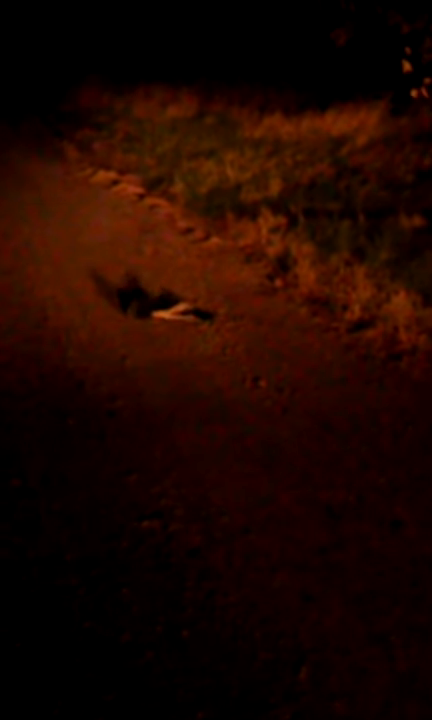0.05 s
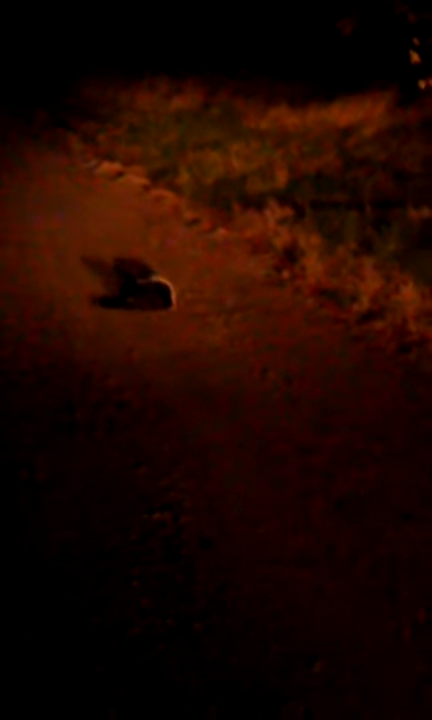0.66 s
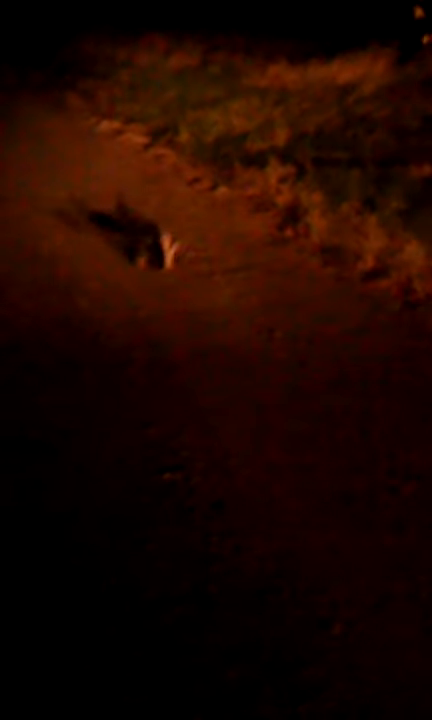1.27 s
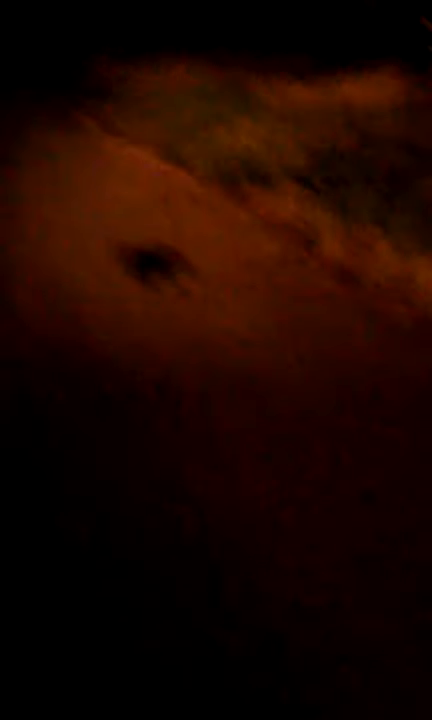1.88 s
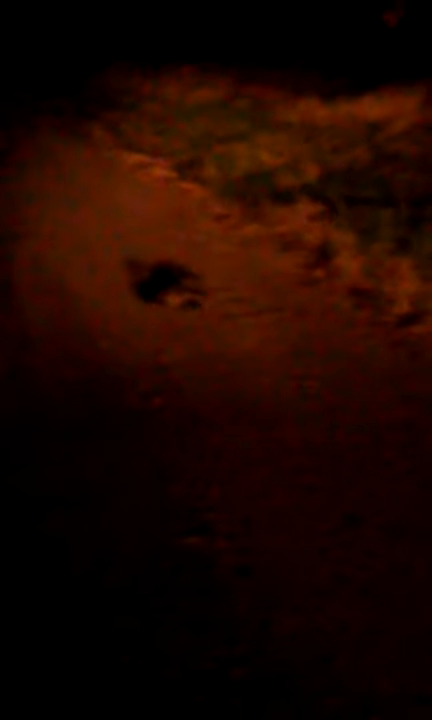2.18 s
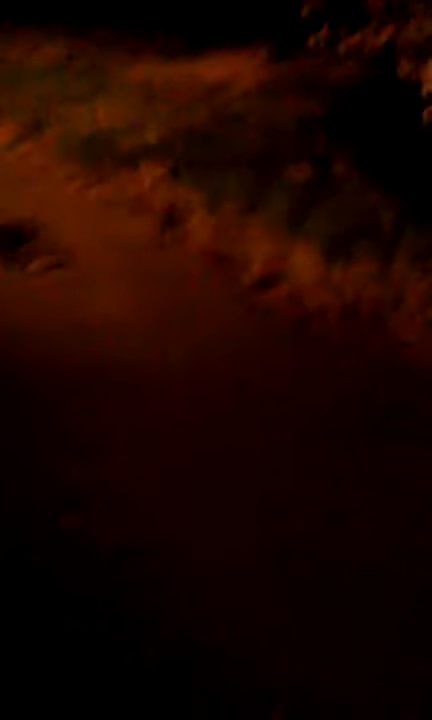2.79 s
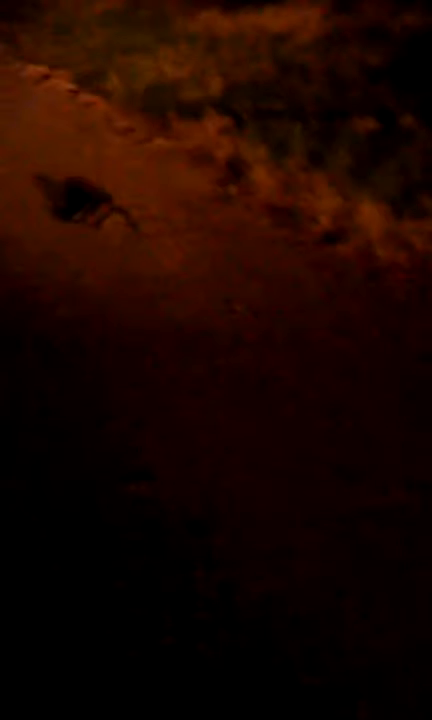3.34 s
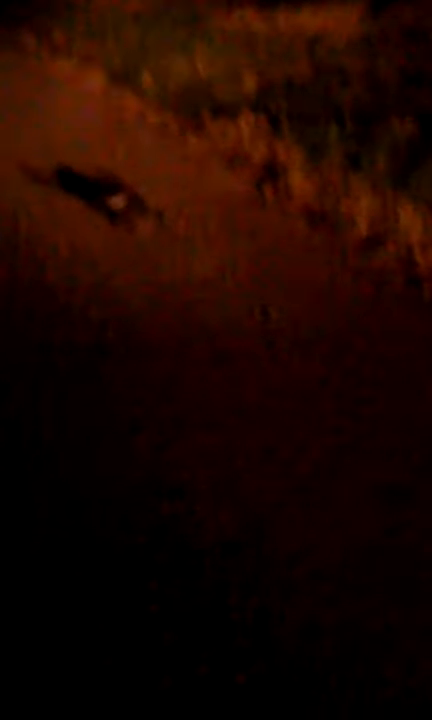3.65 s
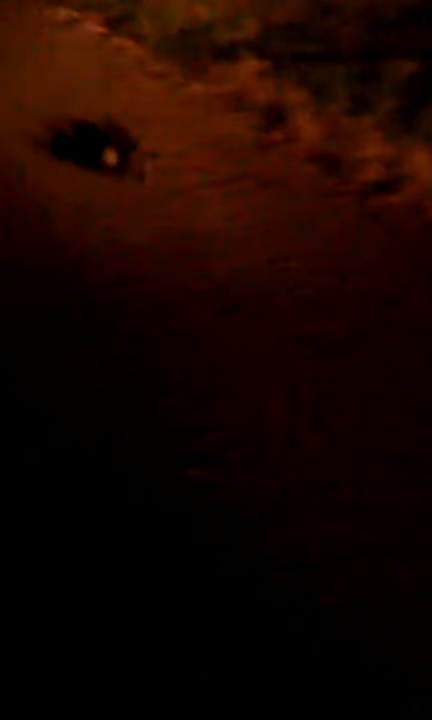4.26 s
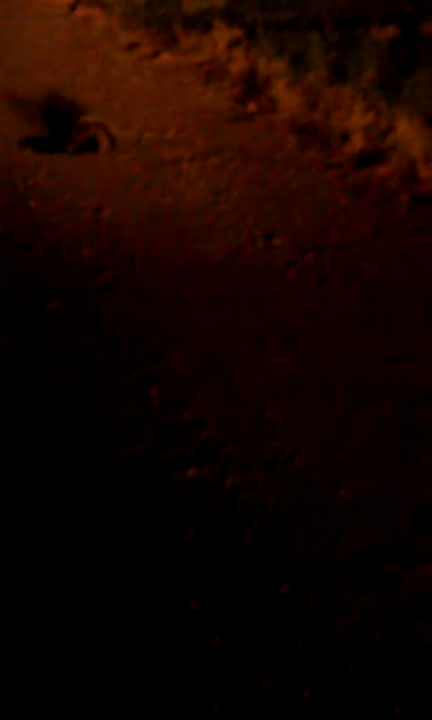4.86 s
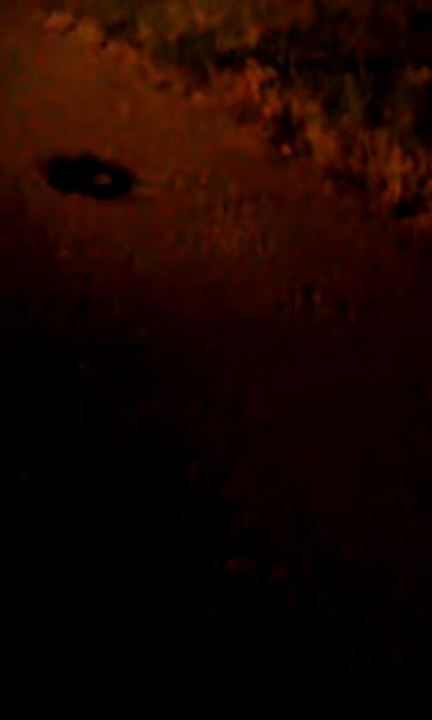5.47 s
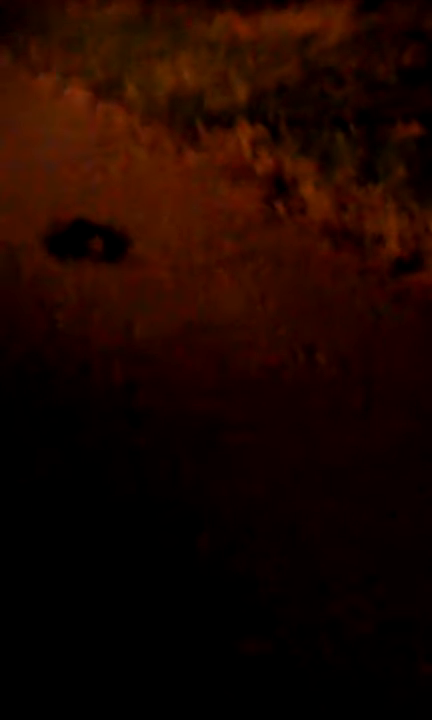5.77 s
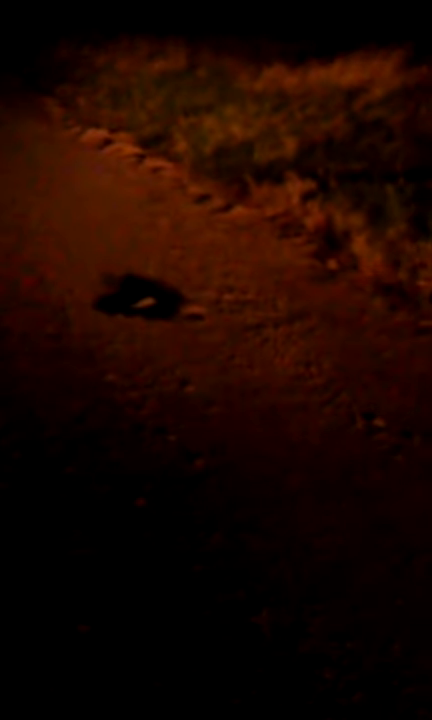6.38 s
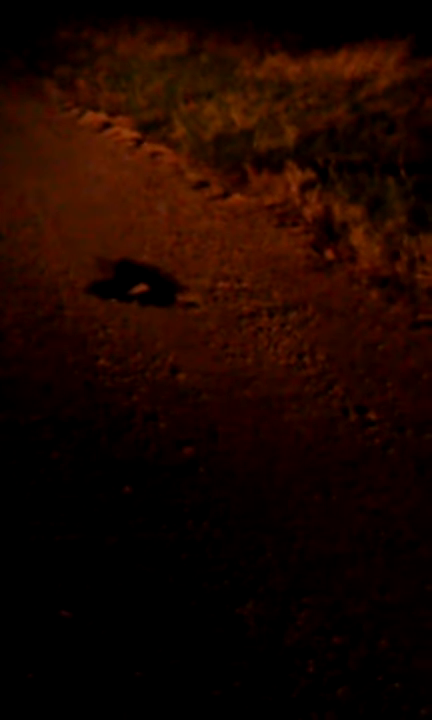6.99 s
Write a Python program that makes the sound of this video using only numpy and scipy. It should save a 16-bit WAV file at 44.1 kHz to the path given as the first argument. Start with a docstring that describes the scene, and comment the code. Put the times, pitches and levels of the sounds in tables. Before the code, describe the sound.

Two skunks fight outdoors at night, squealing in high, hoarse, falling cries over chirping crickets and a few close handling knocks.

```python
"""Two skunks fight on a dirt road at night, squealing in long, hoarse, falling cries.
Their vocal folds whistle near 2 kHz; strain makes the cycles uneven, and throat and mouth shape the rasp.
Gravel scuffs. Crickets trill and chirp with their wings in the verge. The hand holding the microphone
knocks, bumps and rubs its case. Night air and far insects hiss underneath."""
import sys
import numpy as np
from scipy import signal
from scipy.fft import rfft, irfft
from scipy.io import wavfile
from scipy.ndimage import uniform_filter1d

SR = 44100
rng = np.random.default_rng(int(sys.argv[2]) if len(sys.argv) > 2 else 0)


def generate_wav(signal):
    """Clip the signal to [-1, 1] and save it as 16-bit WAV at the path in sys.argv[1]."""
    frames = np.transpose(np.atleast_2d(signal))
    scaled = np.clip(frames, -1, 1) * 32767
    pcm = np.round(scaled).astype(np.int16)
    wavfile.write(sys.argv[1], SR, pcm)


N = 310464
TIME = np.arange(N) / SR
FREQS = np.maximum(np.fft.rfftfreq(N, 1 / SR), 1)
CUTOFF_HZ = 15800


def squeals(smear_hz=90, high_smear_hz=30, hoarse_band_hz=(1150, 2900), undertone_hz=810):
    """Vocal folds whistle; strain makes the cycles uneven, smearing overtones and adding half orders."""
    # Whistle collapses into rasp. Each row: centre in s, half length in s, depth 0-1.
    cracks = [(1.19, 0.047, 0.26), (1.353, 0.037, 1), (2.796, 0.038, 0.54), (4.923, .078, 0.81),
              (5.088, 0.021, 0.74), (5.28, .12, 0.54), (5.838, 0.044, .5)]
    # Every other cycle weakens, adding a tone a fifth up. Each row: start in s, end in s, level in dB.
    breaks = [(4.736, 4.949, -52.5), (5.848, 6.21, -53)]
    pressure, pitch_hz, mouth_hz, whistle_db, overtone_db, rough, register_db = cry_controls()
    crack = np.clip(sum(depth * swell_at(at_s, half_s) for at_s, half_s, depth in cracks), 0, 1)
    rough = np.clip(rough + crack / 4, .2, 1)
    jitter = .00603 * drift(12) + (.005 + .007 * rough) * drift(40)
    base_phase = phase_of(pitch_hz * (1 + jitter))
    shake_hz = pitch_hz * .035 * rough ** 2 * drift(200)
    fold_phase = base_phase + phase_of(shake_hz)

    def partial(order):
        """Cycle shape varies, so each overtone wanders on its own, the high ones most."""
        wander_hz = (smear_hz * order * rough + high_smear_hz * max(order - 2, 0)) * drift(450)
        return np.sin(order * fold_phase + phase_of(wander_hz)) * (order * pitch_hz < CUTOFF_HZ)

    harmonics = sum(partial(k) * from_db(3.9 * drift(26.5)) for k in range(2, 8))
    half_orders = sum(partial(k + .5) * from_db(3 * drift(14)) for k in range(1, 4))
    rasp = rng.standard_normal(N) * (1 + np.cos(fold_phase))   # air escapes once a cycle
    source = harmonics + from_db(-10) * rough ** 2 * half_orders + (.12 + .5 * rough ** 2) * rasp
    overtones = vocal_tract(source, mouth_hz, register_db)

    whistle = np.sqrt(2 * (1 - crack)) * np.sin(base_phase + phase_of(shake_hz * (.556 + crack)))
    hoarse_gain = rough ** 2 * from_db(-7) + crack * from_db(-1) / 2
    hoarse = hoarse_gain * rms_one(butter(rasp, hoarse_band_hz, "band"))
    undertone = np.sqrt(rough) * from_db(-12) * resonance(partial(.5), undertone_hz, width_hz=130)
    break_gain = sum(from_db(db) * gate(start_s, end_s, .04) for start_s, end_s, db in breaks)
    fifth = break_gain * np.sqrt(2) * partial(1.5)

    flutter = evened(from_db(2.9 * rough * drift(170))) * from_db((1.5 + 2 * crack) * drift(33))
    rattle = evened(from_db(2.5 * rough * drift(120)))
    tone = from_db(whistle_db) * flutter * (whistle + hoarse + undertone)
    screech = from_db(overtone_db + 1.16 * drift(6.4)) * overtones + flares(pitch_hz, base_phase)
    return pressure * (tone + rattle * screech + fifth)


def cry_controls(glide_shape=1.3, slack_s=.021, dulling_db_per_s=20, mouth_rest_hz=5527):
    """Each cry scoops up, glides down and drops as the folds go slack; strain swells, holds, lets go."""
    # Each row: start, end and rise time in s, scoop as share of pitch, top and settled pitch in Hz,
    # glide time in s, final drop as share of pitch, first and last whistle level in dB, attack and hold
    # in s, overtone level and its swell in dB, edge, ring and treble in dB re the body register,
    # brightening over the attack in dB, first, full and last roughness (about 0-1).
    cries = [(-.05, .06, .054, .02, 1714, 1700, .09, 0.085, -55, -51.5, .05, .025, -60, -2, -20, -20, -17, 0, .2, 0.5, .35),
             (0.557, 0.887, 0.097, .24, 2576, 1997, 0.099, 0.058, -51.5, -48.5, 0.31, 0.067, -41.5, 19.5, -5, -8.5, -6, -13.5, 0.86, 0.73, .62),
             (0.872, 1.351, 0.019, 0.078, 2142, 2025, .26, 0.17, -46, -46.5, 0.043, 0.22, -43, 5.5, -2, -8.5, -1, -7, 0.8, 0.88, .95),
             (1.363, 2.078, 0.091, 0.16, 2080, 1767, .22, 0.1, -41.5, -49, 0.64, 0.026, -48.5, 5.5, -10, -17.5, -11.5, -1, 0.37, .58, .8),
             (2.622, 3.09, 0.038, .07, 2485, 1856, 0.13, 0.4, -46, -54, 0.25, .12, -48.5, 8.5, -7.5, -9.5, -12, 4, 0.56, 1.02, 1),
             (3.785, 4.123, .031, 0.015, 2286, 2148, 0.097, 0.01, -61, -60, 0.25, 0.051, -52.5, 14, -6.5, -22, -15, 5, 0.58, .65, .5),
             (4.737, 5.106, .29, 0.018, 2174, 2120, 0.0766, 0.0752, -56.5, -49, 0.32, 0.077, -44, 11, -4, -18, -8, 2, .9, 0.46, .6),
             (5.069, 5.428, 0.031, 0.011, 2009, 1683, .058, .08, -47.5, -53.5, .027, .05, -43, 18, 5.5, -9.5, -3.5, 3, 0.67, 0.8, 1),
             (5.798, 6.31, .013, .017, 2316, 1685, 0.14, 0.0084, -45, -51, 0.072, 0.36, -52, 4, -2.5, -20, -17, -1, 0.63, 1.03, .67),
             (6.299, 6.924, 0.37, 0.081, 1780, 1674, 0.12, 0.028, -48.5, -52.5, .071, 0.1, -53.5, 9, -30, -28, -30, 2, .79, 0.53, .35)]
    handovers_s = (cries_array := np.array(cries))[1:, 0] / 2 + cries_array[:-1, 1] / 2
    (start_s, end_s, rise_s, scoop, top_hz, settled_hz, glide_s, drop, first_db, last_db,
     attack_s, hold_s, climax_db, swell_db, edge_db, ring_db, treble_db, brightening_db,
     first_rough, full_rough, last_rough) = cries_array[np.searchsorted(handovers_s, TIME)].T
    top_s, climax_s = start_s + rise_s, start_s + attack_s

    glide = np.exp(-(np.maximum(TIME - top_s, 0) / glide_s) ** glide_shape)
    scooping = 1 - scoop * (1 - ramp(start_s, top_s)) ** 2
    slackening = 1 - drop * np.exp(-np.maximum(end_s - TIME, 0) / slack_s)
    pitch_hz = (settled_hz + (top_hz - settled_hz) * glide) * scooping * slackening
    usual_pitch_hz = cries_array[:, 5].mean()
    mouth_hz = mouth_rest_hz * (pitch_hz / usual_pitch_hz) ** .26   # partly follows the pitch

    attack, release = ramp(start_s, climax_s), ramp(climax_s + hold_s, end_s)
    whistle_db = first_db + (last_db - first_db) * ramp(start_s, end_s)
    overtone_db = climax_db - swell_db * (1 - attack + release)
    dull_db = brightening_db * (1 - attack) + dulling_db_per_s * np.maximum(TIME - climax_s, 0)
    register_db = [db - dull_db for db in (edge_db, ring_db, treble_db)]
    strain = ramp(start_s, climax_s + hold_s)
    rough = first_rough + (full_rough - first_rough) * strain + (last_rough - full_rough) * release
    pressure = np.minimum(sum(gate(on_s, off_s, .03) for on_s, off_s in cries_array[:, :2]), 1)
    return pressure, pitch_hz, mouth_hz, whistle_db, overtone_db, rough, register_db


def vocal_tract(source, mouth_hz, register_db):
    """Fixed throat and moving mouth resonances colour the voice; each register then gets its level."""
    # Throat resonances. Each row: centre in Hz, width in Hz, relative gain in dB.
    formants = [(3720, 630, 33), (8170, 1050, 19.5), (10620, 700, 25.5)]
    throat = sum(from_db(db) * resonance(source, hz, width_hz) for hz, width_hz, db in formants)
    mouth = from_db(19.5) * moving_resonance(source, mouth_hz, width_hz=1200)
    body, *upper = registers(throat + mouth)
    return body + sum(from_db(db + 1.6 * drift(8.8)) * band for db, band in zip(register_db, upper))


def registers(voice, edges_hz=(2600, 4700, 7200, 9500, 14600)):
    """Split into body, edge, ring and treble, each at even power."""
    spectrum = rfft(voice)
    return [evened(irfft(spectrum / np.sqrt((1 + (low / FREQS) ** 40) * (1 + (FREQS / high) ** 40)), N))
            for low, high in zip(edges_hz, edges_hz[1:])]


def flares(pitch_hz, phase, smear_hz=110):
    """An overtone meets a mouth resonance and rings out briefly."""
    # Each row: centre in s, half length in s, resonance in Hz, level in dB.
    meetings = [(1.47, 0.058, 10300, -50), (5.03, .04, 8700, -45.5), (5.224, 0.065, 5100, -49)]
    out = np.zeros(N)
    for at_s, half_s, hz, db in meetings:
        order = round(hz / np.interp(at_s, TIME, pitch_hz))
        overtone = np.sqrt(2) * np.sin(order * phase + phase_of(smear_hz * drift(450)))
        out += from_db(db) * swell_at(at_s, half_s) * overtone
    return out


def gravel_scuffs():
    """Short, bright scuffs on the gravel."""
    # Each row: centre in s, level in dB, half length in s, low and high band edge in Hz.
    scuffs = [(1.26, -50, 0.086, 8800, 13300), (1.363, -44, 0.025, 8780, 12330),
              (1.615, -46, .007, 8390, 14300), (3.8, -50.5, 0.019, 5200, 10480)]
    return friction(scuffs)


def handling(knock_rub=.27, bump_rub=.042, bump_hz=95):
    """Fingers knock the well-damped case; the palm bumps it softly and rumbles."""
    # Each row: time in s, peak of the push in dB, pitch in Hz, rub decay in s.
    knocks = [(1.231, -39, 1123, .021), (1.8325, -22.5, 1382, 0.0023), (2.504, -37, 871, 0.017),
              (2.5461, -35.5, 930, 0.007), (3.303, -41, 944, 0.0038), (3.479, -42.5, 992, 0.016),
              (4.137, -44, 750, 0.021), (4.336, -27.5, 1220, 0.0018), (4.542, -36, 1390, 0.0019),
              (5.1103, -13.5, 1040, 0.00091), (5.422, -28.5, 1273, 0.0017), (5.664, -33, 885, 0.0062),
              (5.924, -42.5, 899, 0.0049), (6.206, -32, 423, 0.02), (6.2158, -17.5, 1295, 0.0031),
              (6.2257, -25, 688, 0.0076), (6.243, -23.5, 1014, .0029), (6.2838, -19, 1024, 0.0019)]
    # Each row: time in s, peak of the push in dB, rumble decay in s.
    bumps = [(0.418, -35.5, 0.013), (0.706, -48, 0.071), (2.598, -35.5, 0.0077), (2.651, -43.5, 0.074),
             (2.795, -40.5, 0.024), (2.929, -41, 0.028), (2.976, -40, 0.01), (6.577, -41.5, 0.033),
             (6.721, -44.5, 0.0081)]

    def case(force, hz):
        ring = resonance(force, hz, width_hz=.82 * hz)
        return butter(butter(ring, 2100, "low", order=5), 280, "high", order=1)

    def palm(force, hz):
        return butter(resonance(force, hz, width_hz=55), 210, "low")

    touches = [(case, at_s, db, hz, rub_s, knock_rub) for at_s, db, hz, rub_s in knocks]
    touches += [(palm, at_s, db, bump_hz, rub_s, bump_rub) for at_s, db, rub_s in bumps]
    out, push = np.zeros(N + SR), signal.unit_impulse(SR // 10)
    for body, at_s, db, hz, rub_s, rub in touches:
        at, force = round(at_s * SR), contact_force(rub_s, rub)
        out[at:at + len(force)] += from_db(db) * body(force, hz) / np.abs(body(push, hz)).max()
    return out[:N]


def contact_force(decay_s, rub, onset_s=.003):
    """A unit push, then friction that sets in and dies away."""
    age_s = TIME[:SR // 2]
    envelope = np.minimum(age_s / onset_s, 1) * np.exp(-age_s / decay_s)
    force = rub * rng.standard_normal(len(age_s)) * envelope
    force[0] = 1
    return force


def finger_scrapes():
    """Fingers scrape across the case."""
    # Each row: centre in s, level in dB, half length in s, low and high band edge in Hz.
    scrapes = [(6.226, -42, 0.02, 1520, 3580), (6.228, -45.5, 0.023, 4530, 11300)]
    return friction(scrapes)


def grip(band_hz=(58, 135), resting_db=-73.5):
    """The hand creeps on the case and rumbles faintly."""
    # Each row: start in s, end in s, level in dB.
    spells = [(0.404, 0.587, -52.5), (1.16, 1.94, -64), (2.433, 2.982, -57)]
    lumps = from_db(4.5 * drift(9))
    creep = rms_one(butter(rng.standard_normal(N), band_hz, "band") * lumps)
    spell_gain = sum(from_db(db) * gate(start_s, end_s, .062) for start_s, end_s, db in spells)
    return (from_db(resting_db) + spell_gain) * creep


def tree_cricket(strokes_per_s=35.905, duty=.64, pitch_hz=2588, fall_hz=170):
    """Unbroken trill, louder midway; each wing stroke slows and so falls in pitch."""
    cycle = (TIME * strokes_per_s - .16) % 1
    along = np.clip(cycle / duty, 0, 1)
    song = np.sin(np.pi * along) * np.sin(phase_of(pitch_hz + fall_hz * (.5 - along)))
    level_db = -59 + 4 * swell_at(3.2, half_s=2.6) + drift(51)
    return from_db(level_db) * rms_one(song)


def near_crickets():
    """Single chirps stand out from the chorus."""
    # Each row: start in s, end in s, pitch in Hz, level in dB.
    chirps = [(1.887, 2.236, 4200, -50.5), (3.349, 3.75, 4210, -55), (3.914, 4.233, 4223, -50),
              (6.167, 6.528, 4204, -49), (6.926, 7.04, 4270, -54)]
    gain = sum(from_db(db) * gate(start_s, end_s, .013) for start_s, end_s, _, db in chirps)
    rows = np.array(chirps)
    pitch_hz = np.interp(TIME, rows[:, :2].ravel(), np.repeat(rows[:, 2], 2))
    return gain * wing_strokes(pitch_hz, fall_hz=47, wander_hz=12)


def cricket_chorus(pitch_hz=4100, spread_hz=65, first_s=.43, period_s=.7455, swell_s=.2):
    """Nine far crickets at slightly different pitches swell in step; the swells slowly fade."""
    swell_db, fade_db_per_s, bed_db = -52, .78, -62
    off_beat_s = (((TIME - first_s) / period_s + .5) % 1 - .5) * period_s
    swell = from_db(swell_db - fade_db_per_s * TIME) * np.exp(-np.abs(off_beat_s / swell_s) ** 3 / 2)
    chorus = sum(wing_strokes(pitch_hz + spread_hz * (offset + .5 * drift(2)), fall_hz=150, wander_hz=45)
                 for offset in np.linspace(-1, 1, 9))
    return (swell + from_db(bed_db)) * rms_one(chorus)


def wing_strokes(pitch_hz, fall_hz, wander_hz, strokes_per_s=38.2):
    """One cricket's wing strokes, each falling in pitch; rms 1."""
    cycle = (phase_of(strokes_per_s + .5 * drift(2)) / (2 * np.pi) + rng.random()) % 1
    stroke = .08 + np.abs(np.sin(np.pi * cycle)) ** 2.5
    hz = pitch_hz + fall_hz * (.5 - cycle) + wander_hz * drift(59.45)
    return rms_one(stroke * np.sin(phase_of(hz)))


def verge(x, wet_db=-17, t60_s=.09):
    """Ground and bushes scatter a faint, short tail."""
    age_s = TIME[:SR // 2]
    decay = from_db(-60 * age_s / t60_s) * (age_s > .008)
    tail = butter(rng.standard_normal(len(age_s)), 5900, "low") * decay
    return x + from_db(wet_db) * signal.fftconvolve(x, tail / np.linalg.norm(tail))[:N]


def night_air(air_db=-58.5, hiss_db=-55.5):
    """Steady low air noise under far insects and hiss."""
    # Two spectra. Each row: frequency in Hz, relative density in dB.
    air = [(25, -13), (60, -18), (130, -5.5), (400, -2), (1700, -3.5), (2300, -9), (4000, -26)]
    insect_hiss = [(1700, -91), (2200, 4), (3400, 2.5), (4300, -5), (7000, -6.5), (10500, -2.5),
                   (13000, -6), (16000, -8)]
    return from_db(air_db) * coloured(air) + from_db(hiss_db) * coloured(insect_hiss)


def friction(rubs):
    """Short gritty rubs, each in its own band."""
    grit = rng.laplace(size=N)
    return sum(from_db(db) * swell_at(at_s, half_s) * rms_one(butter(grit, [low_hz, high_hz], "band"))
               for at_s, db, half_s, low_hz, high_hz in rubs)


def from_db(db):
    """Decibels to gain."""
    return 10 ** (np.asarray(db) / 20)


def rms_one(x):
    """Scale to unit power."""
    return x / np.sqrt(np.mean(x ** 2) + 1e-20)


def evened(x):
    """Hold short-term power at one."""
    return x / np.sqrt(np.maximum(uniform_filter1d(x * x, size=900), 0) + 1e-12)


def drift(rate_hz):
    """Random wander, rolled off above rate_hz; rms 1."""
    return rms_one(irfft(rfft(rng.standard_normal(N)) / (1 + (FREQS / rate_hz) ** 4), N))


def coloured(spectrum):
    """Noise with the given spectrum; rms 1."""
    hz, db = np.transpose(spectrum)
    gain = from_db(np.interp(np.log(FREQS), np.log(hz), db))
    return rms_one(irfft(rfft(rng.standard_normal(N)) * gain, N))


def butter(x, hz, kind, order=2):
    """Causal Butterworth filter."""
    return signal.sosfilt(signal.butter(order, hz, kind, fs=SR, output="sos"), x + 1e-18)


def two_pole(hz, width_hz):
    """Resonator coefficients, peak gain 1."""
    r = np.exp(-np.pi * width_hz / SR)
    return np.array([1, 0, -1]) * (1 - r * r) / 2, [1, -2 * r * np.cos(2 * np.pi * hz / SR), r * r]


def resonance(x, hz, width_hz):
    """Resonance with a steady centre."""
    return signal.lfilter(*two_pole(hz, width_hz), x + 1e-18)


def moving_resonance(x, hz, width_hz, block=512):
    """Resonance retuned block by block."""
    state, out = np.zeros(2), np.zeros(N)
    for i in range(0, N, block):
        out[i:i + block], state = signal.lfilter(*two_pole(hz[i], width_hz), x[i:i + block], zi=state)
    return out


def phase_of(hz):
    """Running phase in radians."""
    return 2 * np.pi * np.cumsum(hz) / SR


def gate(start_s, end_s, edge_s):
    """One between two times, with sloping edges."""
    return np.clip(np.minimum(TIME - start_s, end_s - TIME) / edge_s + .5, 0, 1)


def ramp(start_s, end_s):
    """Zero to one between two times."""
    return np.clip((TIME - start_s) / np.maximum(end_s - start_s, 1e-3), 0, 1)


def swell_at(at_s, half_s):
    """Bell curve around one moment."""
    return np.exp(-((TIME - at_s) / half_s) ** 2)


def scene():
    """Animals at a distance, the hand close by, night air all round; mono."""
    night = night_air()
    distant = verge(squeals() + gravel_scuffs() + tree_cricket())
    crickets = cricket_chorus() + near_crickets()
    hand = handling() + finger_scrapes() + grip()
    return (distant + crickets + hand + night)[None]


def record(dry):
    """Steep low-pass at CUTOFF_HZ."""
    return irfft(rfft(dry) / np.sqrt(1 + (FREQS / CUTOFF_HZ) ** 400), N)


dry = scene()
out = record(dry)
generate_wav(out)
```